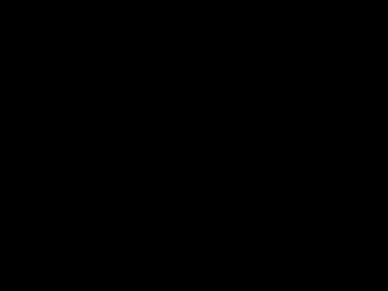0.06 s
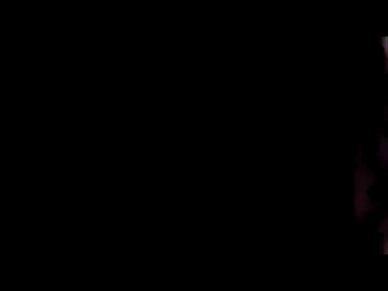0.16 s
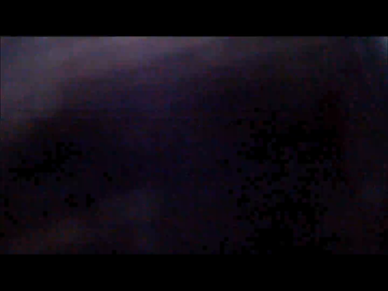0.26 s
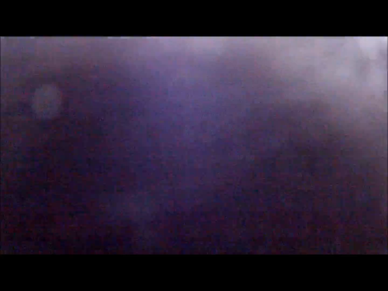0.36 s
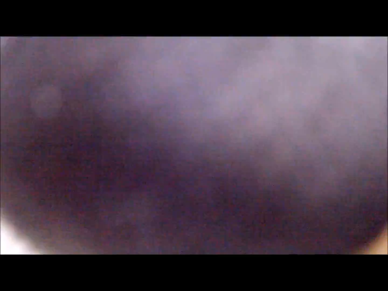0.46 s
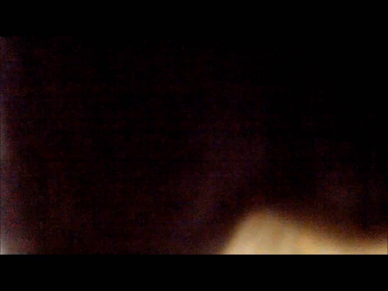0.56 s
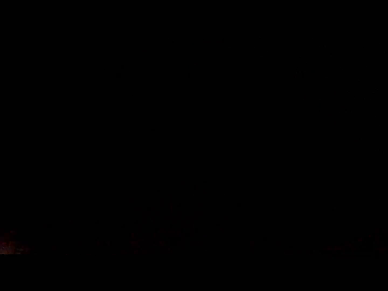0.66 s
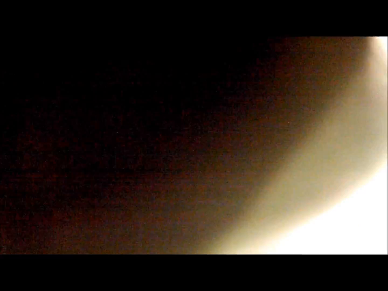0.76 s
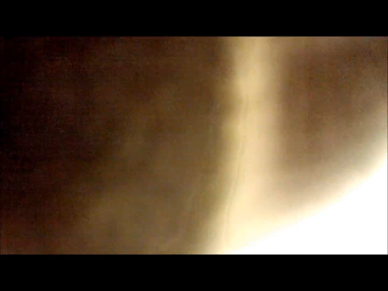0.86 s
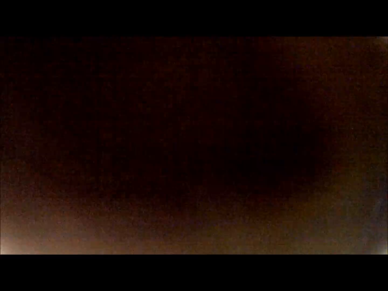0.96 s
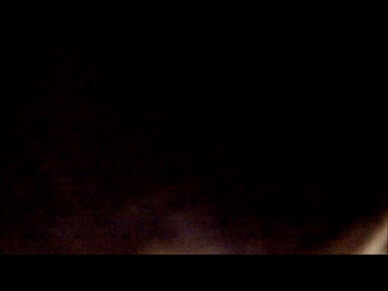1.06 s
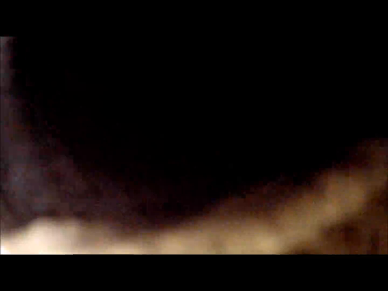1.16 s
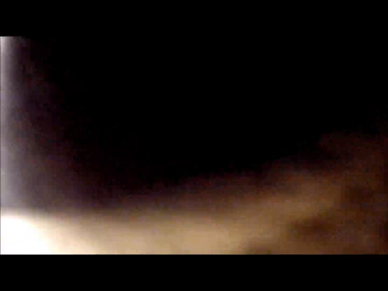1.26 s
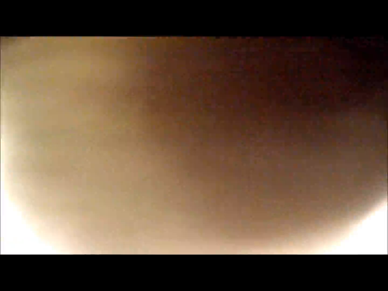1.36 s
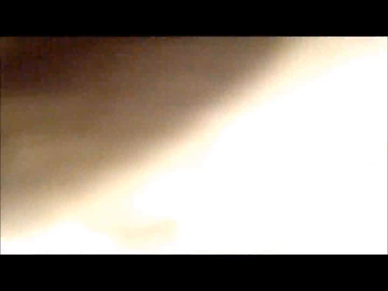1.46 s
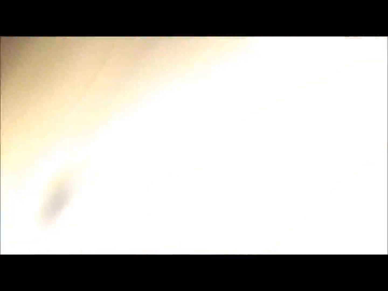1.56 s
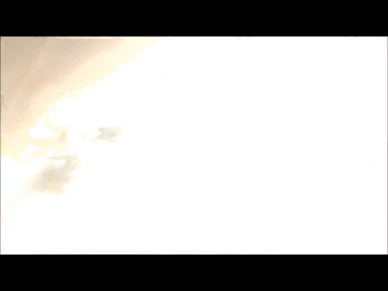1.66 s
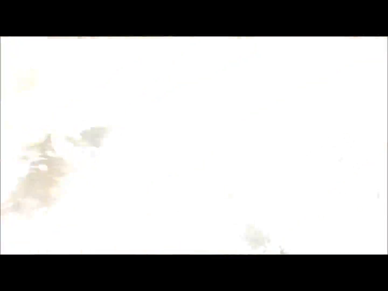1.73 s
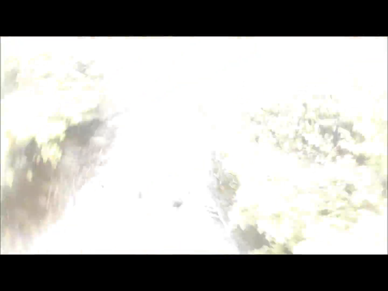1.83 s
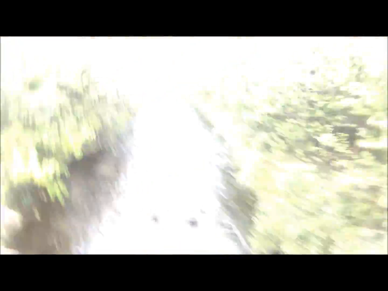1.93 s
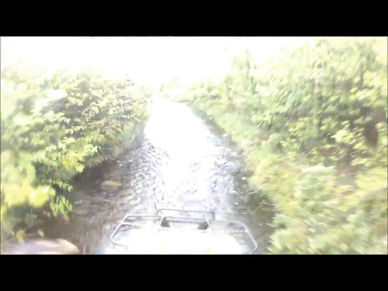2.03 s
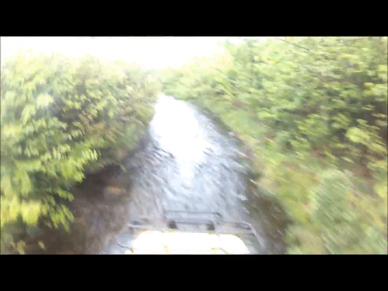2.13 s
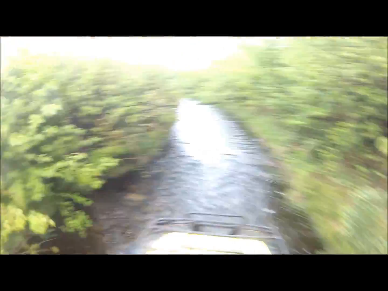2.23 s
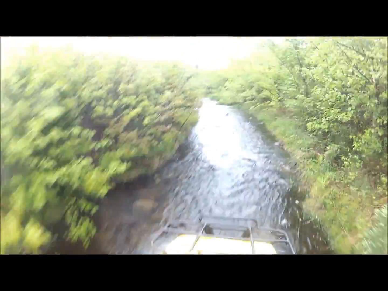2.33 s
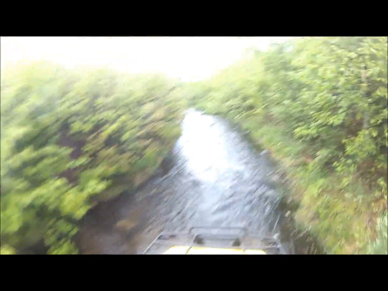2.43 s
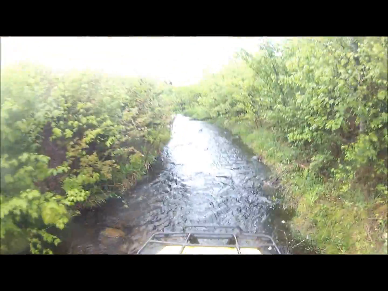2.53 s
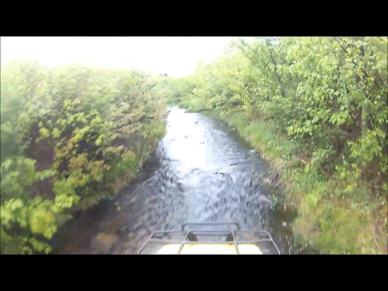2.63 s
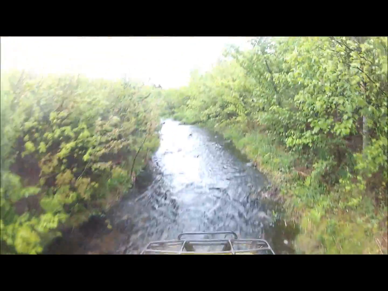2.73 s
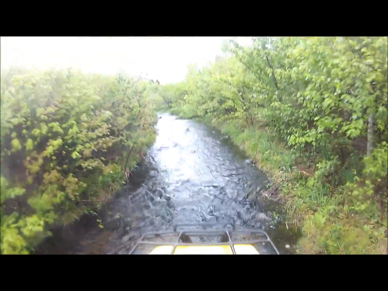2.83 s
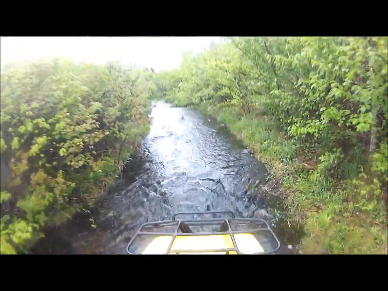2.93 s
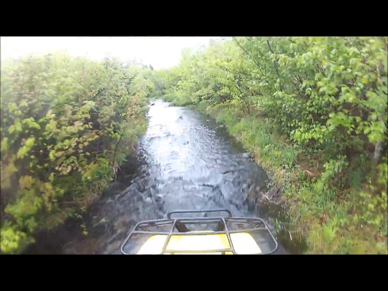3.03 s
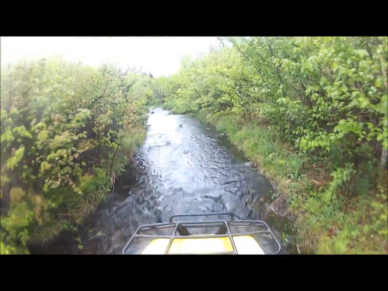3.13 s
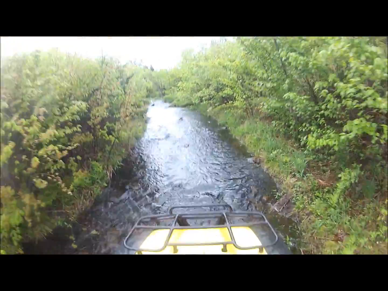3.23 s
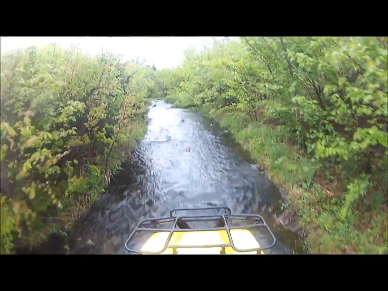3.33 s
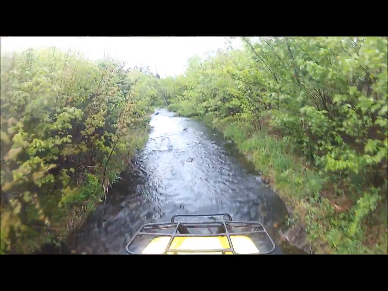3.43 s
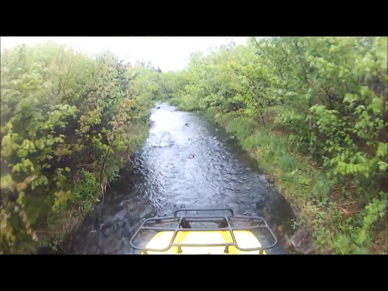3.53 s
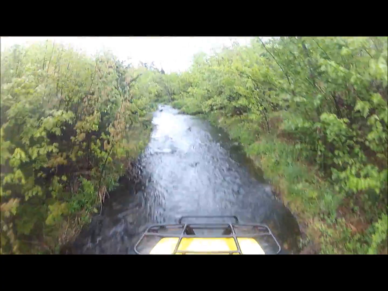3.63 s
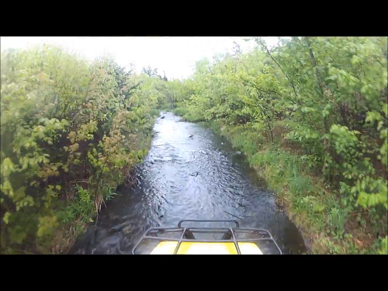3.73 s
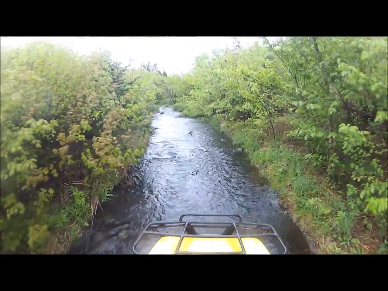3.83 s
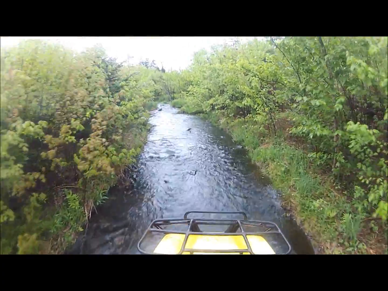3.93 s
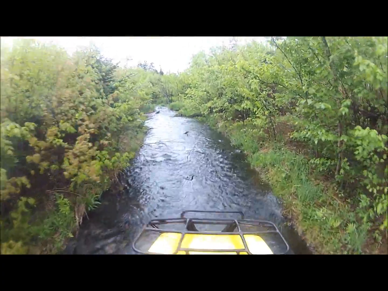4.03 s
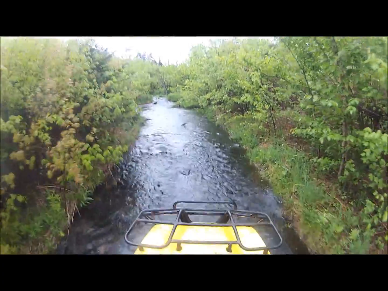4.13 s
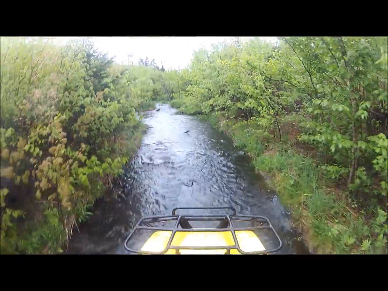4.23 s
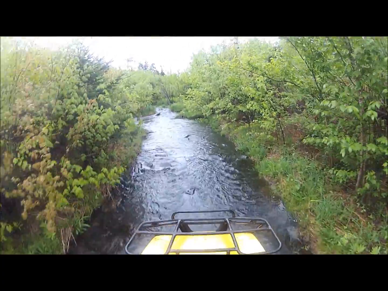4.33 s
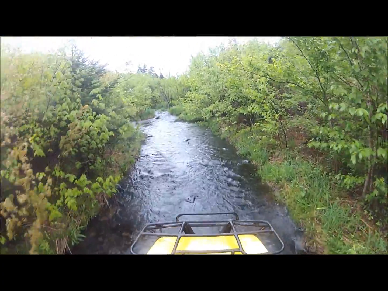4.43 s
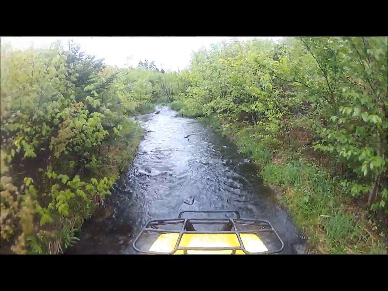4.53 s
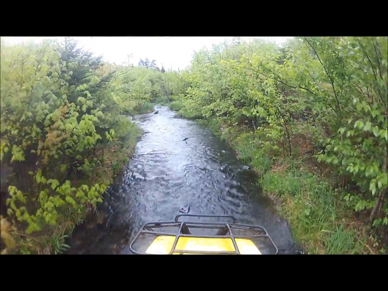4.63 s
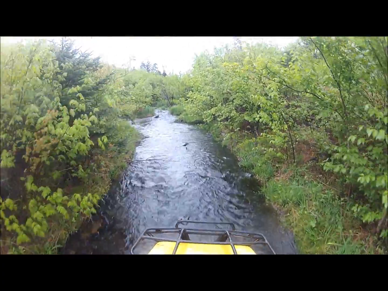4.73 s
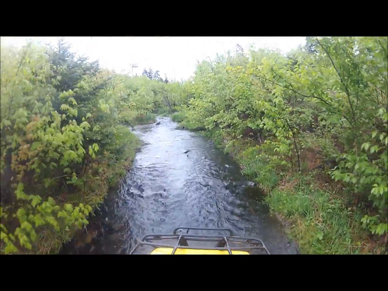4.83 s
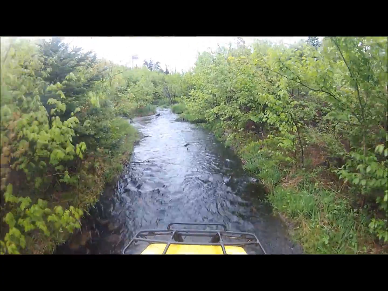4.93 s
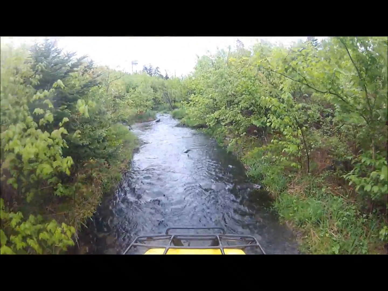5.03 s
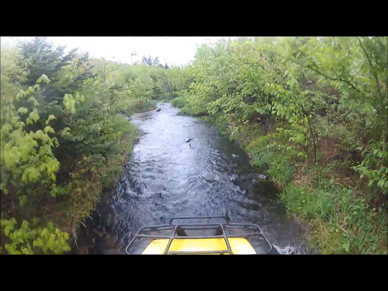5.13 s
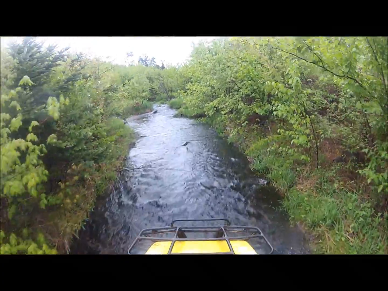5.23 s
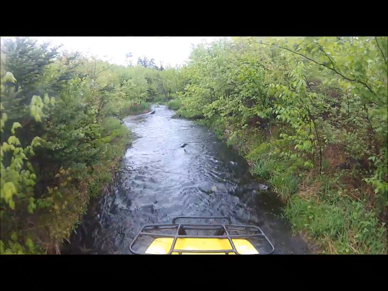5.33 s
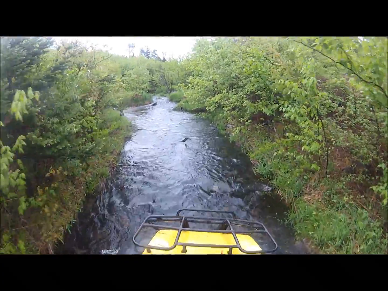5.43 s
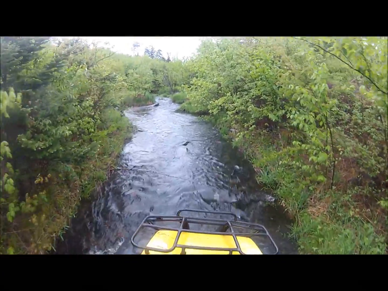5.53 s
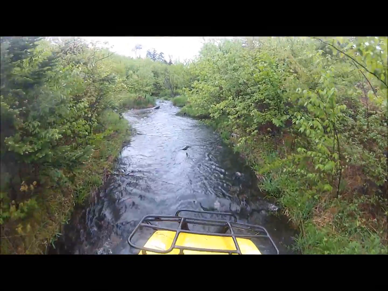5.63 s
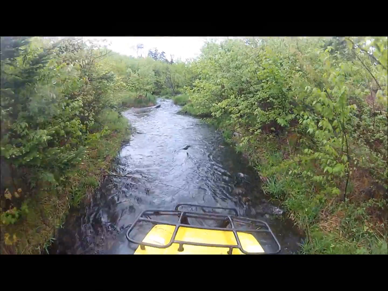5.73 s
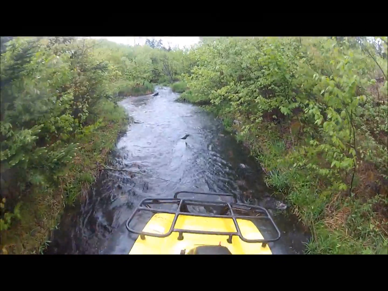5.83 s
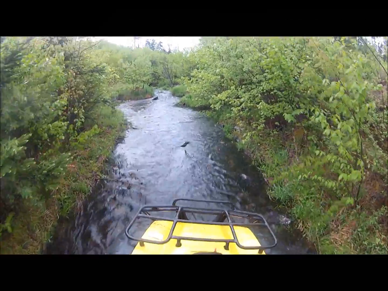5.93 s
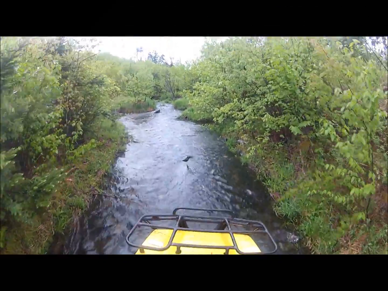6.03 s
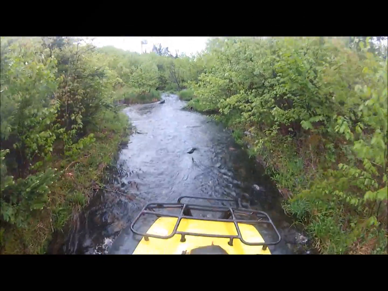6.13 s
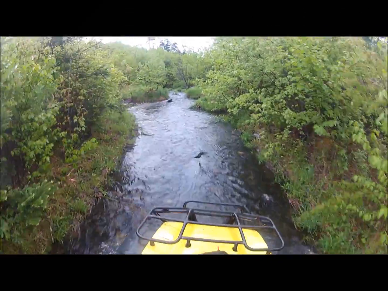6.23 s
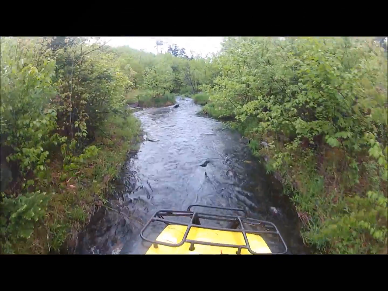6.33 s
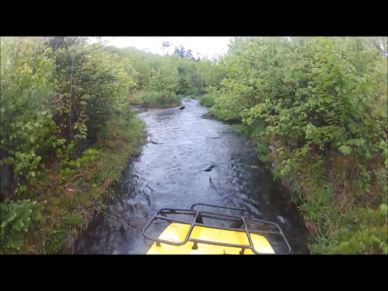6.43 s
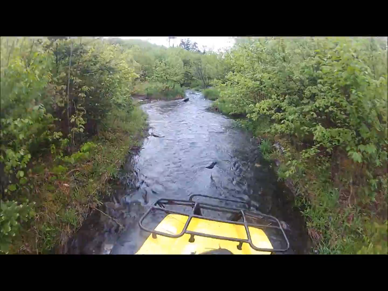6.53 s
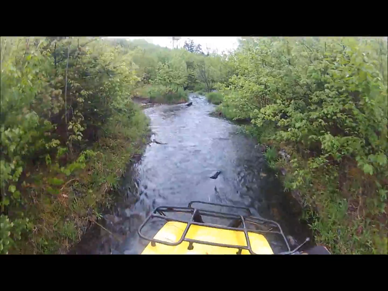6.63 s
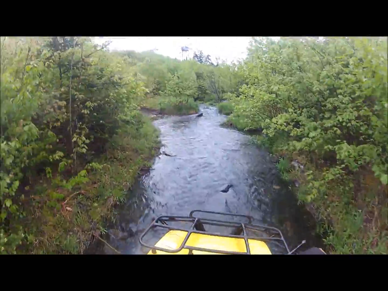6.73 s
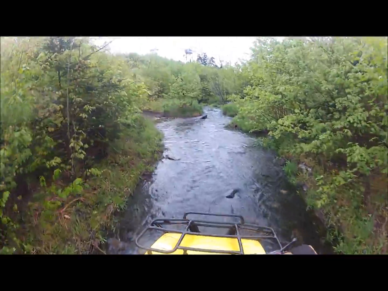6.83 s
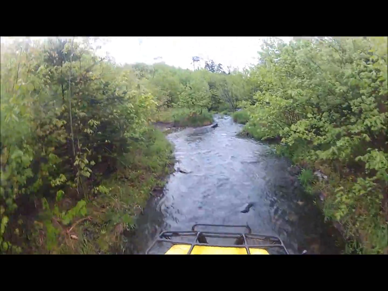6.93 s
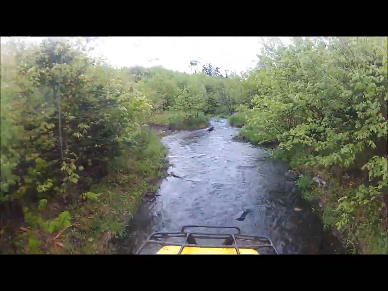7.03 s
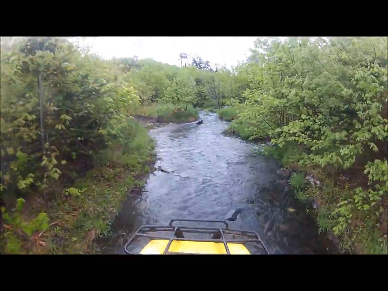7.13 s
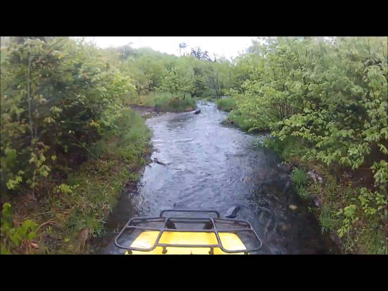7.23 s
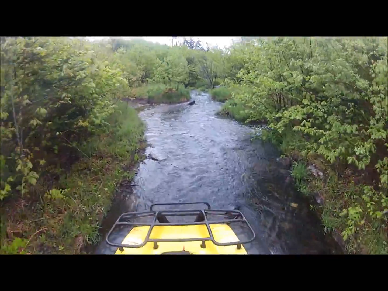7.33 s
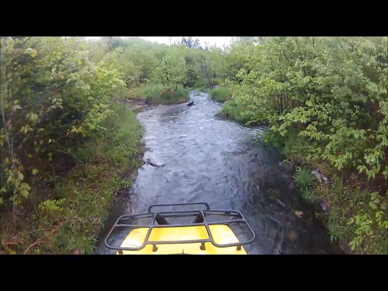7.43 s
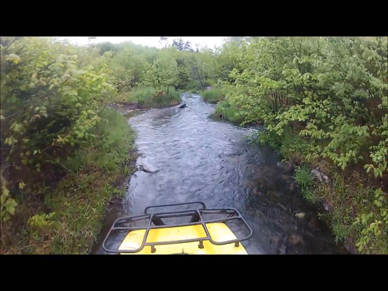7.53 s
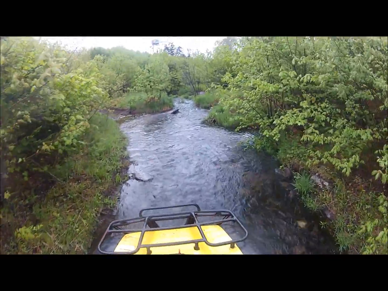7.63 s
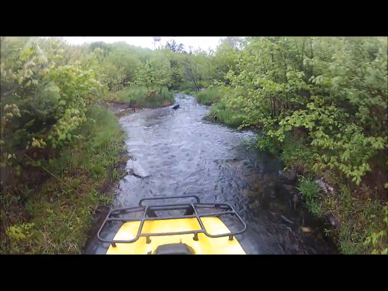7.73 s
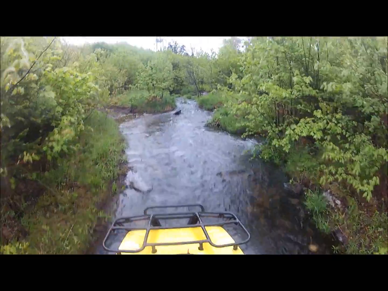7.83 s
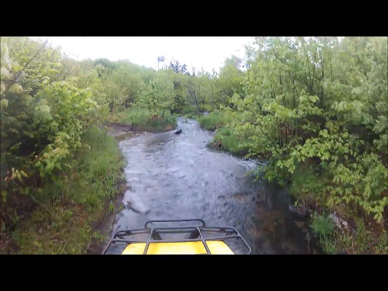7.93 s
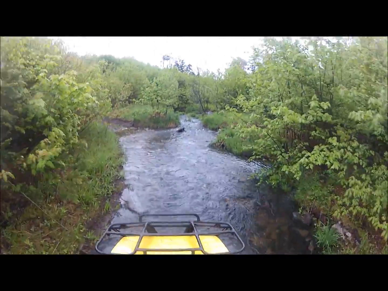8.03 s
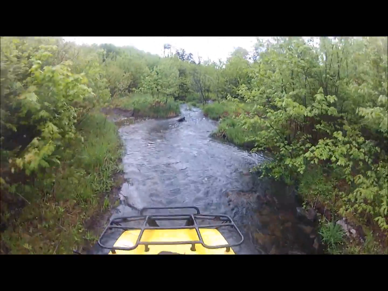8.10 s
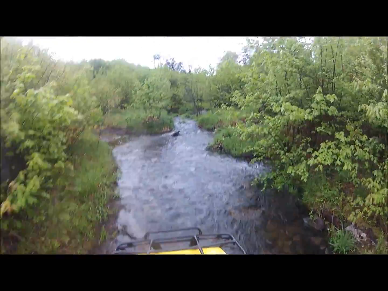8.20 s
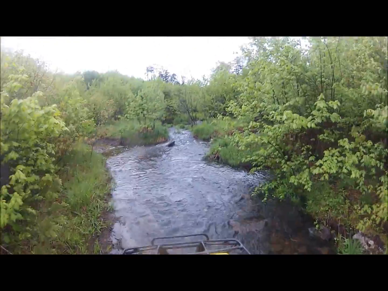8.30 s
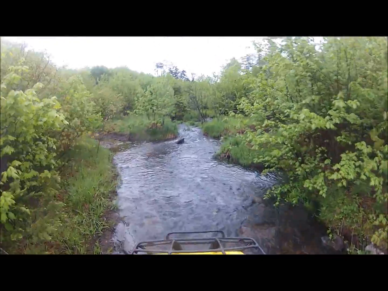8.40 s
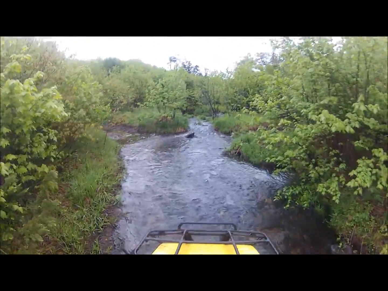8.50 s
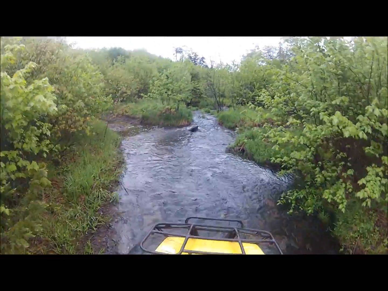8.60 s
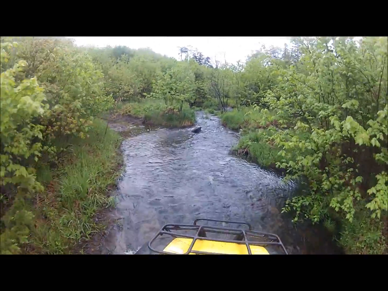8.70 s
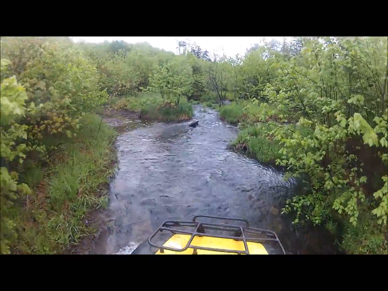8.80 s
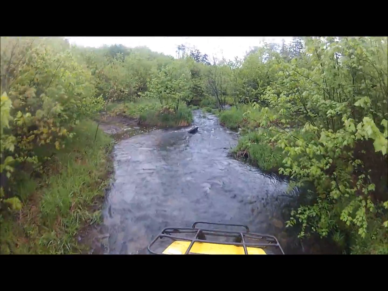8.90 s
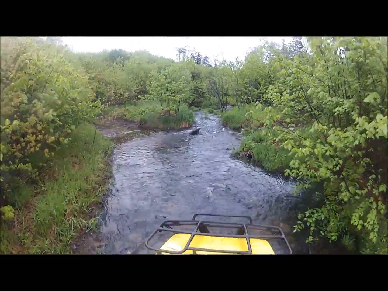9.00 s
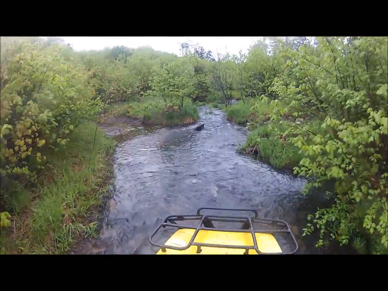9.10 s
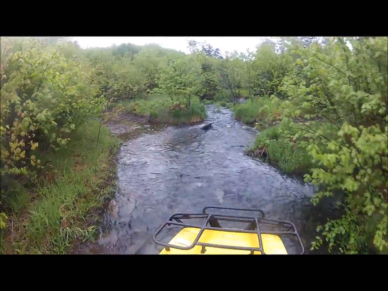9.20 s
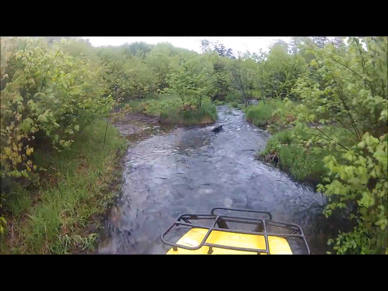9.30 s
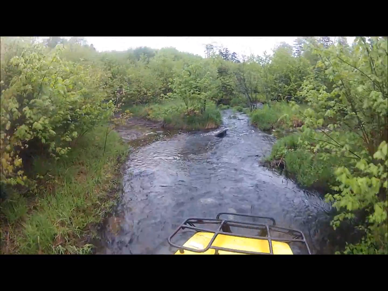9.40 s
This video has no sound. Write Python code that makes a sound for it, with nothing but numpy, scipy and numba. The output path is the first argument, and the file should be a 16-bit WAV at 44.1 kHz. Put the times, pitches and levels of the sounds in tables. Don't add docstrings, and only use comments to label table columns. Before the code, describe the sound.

A gloved hand knocks and scrapes loudly at a camera housing, then a quad bike putters steadily through a splashing creek, muffled and gritty.

```python
import sys
import numpy as np
from scipy import signal
from scipy.fft import rfft, irfft, next_fast_len
from scipy.io import wavfile
from scipy.ndimage import uniform_filter1d
from numba import njit

SR = 44100
rng = np.random.default_rng(int(sys.argv[2]) if len(sys.argv) > 2 else 0)


def persist_wave(psi):
    counts = np.round(np.clip(psi, -1, 1) * 32767).astype(np.int16)
    wavfile.write(sys.argv[1], SR, np.atleast_2d(counts).T)


def ratio(d):
    e = np.asarray(d, float) / 20
    return 10 ** e


N = 417186
HAND_N = int(2.45 * SR)
STRIKE_T = np.arange(8000) / SR
IDLE_HZ = 25.65
SWAY_HZ = 73.5


def level(x, db):
    return x * ratio(db) / np.sqrt(np.mean(x ** 2))


@njit
def svf(x, hz, width):
    y, b, l = np.empty(len(x)), 0., 0.
    g, k = np.tan(np.pi * hz / SR), width / hz
    for i in range(len(x)):
        v = (b + g * (x[i] - l)) / (1 + g * (g + k))
        b, l, y[i] = 2 * v - b, l + 2 * g * v, k * v
    return y


def ring(x, modes):
    out = 0
    for k, (hz, width, db) in enumerate(modes):
        out = out + (-1) ** k * ratio(db) * svf(x, 1. * hz, 1. * width)
    return out


def walk(rate, size=N):
    steps = np.repeat(rng.standard_normal(int(size * rate / SR) + 2), repeats=8)
    slewed = uniform_filter1d(uniform_filter1d(steps, size=8), size=8)
    return 1.3 * np.interp(np.arange(size) * 8 * rate / SR, np.arange(len(slewed)), slewed)


def grit(rate, scatter_db, size=N):
    out, at = np.zeros(size), rng.integers(0, size, int(rate * size / SR))
    out[at] = rng.standard_normal(len(at)) * ratio(scatter_db * rng.exponential(size=len(at)))
    return level(out, 0)


def curves(rows, size=N):
    t, *columns = np.transpose(rows)
    return [np.interp(np.arange(size) / SR, t, column) for column in columns]


def noise_bands(modes, beat, modulation):
    drive = (1 + 0.039 * beat) * (rng.standard_normal((2, N)) + 0.2 * grit(1500, scatter_db=2.5))
    out = 0
    for k, (hz, width, db) in enumerate(modes):
        band = svf(svf(drive[k % 2], 1. * hz, 1.64 * width), 1. * hz, 1.64 * width)
        band = level(band * modulation(hz), db)
        out = out + band * np.sqrt(width / 300) * (1 + .14 * walk(9))
    return out


# f/Hz, bandwidth/Hz, level/dB
SPLASH = [(3348, 157, -6.5), (3620, 390, -12.5), (4310, 440, -14.5), (4810, 310, -15.5), (5120, 750, -22)]


def creek(beat, clatter_db):
    splash_db = -57 + .6 * walk(4)
    return noise_bands(SPLASH, beat, lambda hz: ratio(splash_db - clatter_db))


# f/Hz, bandwidth/Hz,
# level/dB
CLATTER = [(25, 69, -4), (76, 29, 0.5), (199, 65, -7.5), (319, 110, -5.5), (668, 104, -4), (926, 110, -5.5),
           (1190, 170, -7.5), (1530, 120, -4.5), (1774, 134, 1.5), (1990, 310, -3), (2314, 176, -3)]


def valve_gear(beat):
    putt = 1 + .5 * beat
    return noise_bands(CLATTER, beat, lambda hz: putt if 100 < hz < 500 else 1)


def gear_whine(cycles):
    teeth_per_firing, whine_db = 68.5, -7.5
    jitter = np.cumsum(0.0902 * rng.standard_normal(N))
    mesh = np.cos(2 * np.pi * teeth_per_firing * cycles + jitter)
    return mesh * ratio(whine_db + 3.1 * walk(7.6) + 3.9 * walk(60))


# multiple of firing rate, level/dB
FIRING = [(1, -21), (2, -13), (3, -16), (4, -11), (5, 0), (6, -4), (7, -23), (8, -17), (9, -24), (10, -23),
          (11, -20), (12, -13.5), (13, -25), (14, -28), (15, -27), (16, -29)]


def exhaust(hz, cycles):
    pipe_hz, silencer_hz, width_hz = 143, 324, 24
    out = 0
    for k, db in FIRING:
        waver = walk(9)
        lag = 2.8 - 1.9 * max(abs(k - 5) - 1, 0)
        mode_hz = pipe_hz if k < 9 else silencer_hz
        gain = np.hypot(width_hz, k * IDLE_HZ - mode_hz) / np.hypot(width_hz, k * hz - mode_hz)
        phase = 2 * np.pi * k * (cycles - .2) - lag + 0.026 * k * waver[::-1]
        out = out + ratio(db) * gain * (1 + 0.19 * waver) * np.cos(phase)
    return level(out, 0)


# t/s, firing rate f/Hz, exhaust level/dB
RIDE = [(1.95, 27.8, -46), (2.4, 28.8, -42.5), (2.9, 28.6, -43.5), (3.3, 27.2, -42), (3.65, 25.8, -42),
        (4.3, 25.1, -41.5), (4.55, 23.8, -43), (4.9, 24.3, -43.5), (5.65, 26.2, -43), (6.3, 25.4, -41.5),
        (6.9, 25.1, -43), (7.7, 26.4, -44), (7.9, 28.2, -42.5), (8.1, 26.8, -43), (8.5, 29.3, -45),
        (8.85, 27.8, -45), (9.1, 29.5, -43), (9.46, 27.3, -44)]


def engine_and_water():
    hz, exhaust_db = curves(RIDE)
    hz = hz + .38 * np.cos(2 * np.pi * 2.51 * (np.arange(N) / SR - 3.12))
    clatter_db = -48.7 + .8 * (hz - IDLE_HZ) + .6 * walk(6)
    cycles = np.cumsum(hz * (1 + 0.00202 * walk(14))) / SR
    beat = np.cos(2 * np.pi * (cycles - .35))
    bed = creek(beat, clatter_db) + valve_gear(beat) + gear_whine(cycles)
    return exhaust(hz, cycles) * ratio(exhaust_db) + bed * ratio(clatter_db - 1.5)


# t/s, level/dB
NUDGES = [
    (4.1, -51),
    (6.9, -43),
    (7.776, -36),
    (9.0, -44),
]


def mount_bumps():
    out, t = np.zeros(N), STRIKE_T
    for s, db in NUDGES:
        i = int(s * SR)
        out[i:i + len(t)] += ratio(db) * np.sin(2 * np.pi * SWAY_HZ * t) * np.exp(-t / .05)
    return out


# f/Hz, bandwidth/Hz, level/dB
HOUSING = [(655, 180, -4), (1138, 165, -2.5), (2090, 352, 0), (3597, 596, -5.5), (5600, 1200, -22.5),
           (362, 45, -1.5)]


def strikes(rows):
    out, t = np.zeros(N), STRIKE_T
    for s, crack_db, thud_db, hz, thud_hz in rows:
        rattle = rng.standard_normal(len(t)) * np.exp(-(t * 1000 / 3) ** 3)
        spot = [(hz, 1.5 * hz, 0)]
        crack = ring(ring(ring(rattle, HOUSING), spot), spot)
        thud = np.sin(2 * np.pi * thud_hz * t) * t * np.exp(-t * thud_hz * 0.91)
        blow = crack / abs(crack).max() + ratio(thud_db + 5.5) * thud / abs(thud).max()
        i = int(s * SR)
        out[i:i + len(t)] += ratio(crack_db) * blow
    return out


# t/s, crack level/dB, relative thud level/dB, wall f/Hz, thud f/Hz
JOLTS = [
    (2.186, -23, -15, 800, 336),
    (7.775, -34.5, -5, 500, 226),
    (7.786, -42, -10, 720, 243),
    (7.79, -40, -6, 720, 323),
]


def stones():
    return strikes(JOLTS)


# f/Hz, level/dB
SNAP = [(1870, -5), (2160, -10.5), (3315, -7), (3730, -12), (5060, -25), (5050, -24), (1090, -15),
        (303, -11), (620, -16)]


def latch():
    out, t = np.zeros(N), STRIKE_T
    contact_ms, decay_ms = 2.43, 0.88
    envelope = np.clip(t * 4000, 0, 1) * np.exp(-np.clip(t * 1000 - contact_ms, 0, None) / decay_ms)
    tones = sum(ratio(db) * np.sin(2 * np.pi * hz * t + 1.48 * k) for k, (hz, db) in enumerate(SNAP))
    rasp = ratio(-11) * ring(rng.standard_normal(len(t)), [(4800, 3400, 0)])
    i = int(1.2451 * SR)
    out[i:i + len(t)] += envelope * (tones + rasp)
    return out


# t/s, crack level/dB, relative thud level/dB, wall f/Hz, thud f/Hz
KNOCKS = [(0.027, -11, 3, 2020, 131), (0.06, -16.5, -4, 2060, 111), (0.308, -29, 3.5, 2040, 165),
          (0.535, -26, -6, 2060, 110), (0.562, -17.5, -15, 657, 152), (0.649, -18.5, -8, 2150, 173),
          (0.729, -17, -12, 2210, 143), (0.889, -32.5, -3, 401, 128.6), (0.931, -25, 4.5, 743, 115.5),
          (0.984, -16.5, -13, 401, 108), (1.174, -33.5, -1.5, 659, 108), (1.285, -16, -22, 2120, 332),
          (1.334, -22.5, 0, 2060, 220), (1.607, -21.5, -4, 652, 109), (1.666, -20, -12, 2070, 113),
          (1.718, -8.5, -22, 1640, 145)]


def knocks():
    return strikes(KNOCKS)


# start t/s, end t/s, first scrape level/dB, last scrape level/dB, relative flex level/dB
WIPES = [(0, 0.045, -24.5, -22, -10), (0.032, .036, -29.5, -23, 15), (0.064, 0.164, -29.5, -42, -6),
         (0.311, 0.382, -31.5, -33.5, 6.5), (0.46, 0.494, -32.5, -30.5, 9), (0.534, 0.537, -28, -30.5, 11),
         (0.643, 0.717, -27, -28.5, 5), (0.728, 0.797, -30.5, -27.5, 2.5), (0.903, 0.966, -33.5, -31, 8.5),
         (0.986, 1.052, -30.5, -29.5, 5.5), (1.126, 1.166, -38, -31.5, -6), (1.298, 1.355, -30, -29.5, -1),
         (1.368, 1.495, -32, -31.5, -1), (1.506, 1.586, -38.5, -34.5, -2), (1.603, 1.669, -28, -26.5, -1),
         (1.684, 1.712, -22.5, -22.5, -10), (1.721, 1.726, -18, -17, -18)]
# widest swing t/s, level/dB, build-up t/s
SHOVES = [(.035, -21, 0.018), (.075, -26, 0.018), (.165, -27.5, 0.036), (.39, -21.5, 0.046),
          (.505, -15.5, 0.028), (.56, -17, .02), (.66, -26, 0.03), (.73, -28.5, .04), (.8, -24, .03),
          (.91, -23, 0.017), (1.0, -23, 0.055), (1.15, -31, 0.017), (1.25, -31, 0.017), (1.34, -24, .03),
          (1.395, -26.5, 0.018), (1.44, -26.5, .03), (1.485, -25, 0.033), (1.55, -30, .03),
          (1.61, -24, 0.047), (1.65, -22, .02), (1.695, -10.5, .014), (1.734, -12, 0.044),
          (2.259, -43.5, .08)]


def contact():
    t = np.arange(HAND_N) / SR
    lift_db = 2500 * np.clip(t - 1.732, 0, None)
    scrape = ratio(-47 - lift_db) ** 2 + 1e-10
    flex, sway = scrape * ratio(5.5), 1e-7
    bite_db_s, release_db_s = 453, 612
    for start, end, first_db, last_db, flex_db in WIPES:
        db = np.interp(t, [start, end], [first_db, last_db]) - lift_db
        db = db - bite_db_s * np.clip(start - t, 0, None) - release_db_s * np.clip(t - end, 0, None)
        scrape = scrape + ratio(db) ** 2
        flex = flex + ratio(db + flex_db) ** 2
    free_db_s, gripped_db_s = 174, 398
    for s, db, build_s in SHOVES:
        loss = free_db_s if s > 1.7 else gripped_db_s
        build_db = 7.6 * (np.clip(s - t, 0, None) / build_s) ** 2
        sway = sway + ratio(db - build_db - loss * np.clip(t - s, 0, None)) ** 2
    scrape_db, flex_db, sway_db = (10 * np.log10(p) for p in (scrape, flex, sway))
    creak_db = -14 + 0.57 * (sway_db - scrape_db) + 0.5 * (sway_db + 26.5)
    return scrape_db, flex_db, sway_db, np.clip(creak_db, -20, 1.5)


# f/Hz, bandwidth/Hz, level/dB
CREAK = [(669, 31, 4.5), (1660, 240, -8.5)]


def friction(creak_db):
    rub = rng.standard_normal(HAND_N) + 0.57 * grit(2000, scatter_db=3.0, size=HAND_N)
    rub = rub * ratio(1.32 * walk(70.0, size=HAND_N) + 1.04 * walk(200, size=HAND_N))
    walls = ring(ring(rub, HOUSING), [(1700, 3900, 0)])
    creak = ring(ring(rub[::-1].copy(), CREAK), [(1000, 2100, 0)])
    hiss = ring(ring(rub, [(5400, 1400, 0)]), [(5400, 1400, 0)])
    return level(walls, -1.05) + level(creak, 0.7) * ratio(creak_db) + level(hiss, -37.5) * ratio(-.9 * creak_db)


def mount_sway(held):
    hz = SWAY_HZ * (1 + held * (.09 * walk(34.78, size=HAND_N) - .08))
    turn = 2 * np.pi * np.cumsum(hz) / SR
    return (np.sin(turn) + 0.094 * np.cos(2 * turn)) * ratio(3.5 + held * walk(30.3, size=HAND_N))


# f/Hz, bandwidth/Hz, level/dB
FLEX = [(132, 71, -2), (198.4, 92, -4), (294, 118, -8)]


def wiping():
    scrape_db, flex_db, sway_db, creak_db = contact()
    push = ratio(2.8 * walk(30.0, size=HAND_N)) * rng.standard_normal(HAND_N)
    flex = level(ring(ring(push, FLEX), [(166, 200, 0)]), -1.0)
    shove = level(ring(ring(push, [(42, 26, 0)]), [(42, 26, 0)]), -9.5)
    held = np.clip((scrape_db + 49.5) / 15, 0, 1)
    hand = friction(creak_db) * ratio(scrape_db) + flex * ratio(flex_db)
    hand = hand + (mount_sway(held) + held * shove) * ratio(sway_db)
    return np.pad(hand, (0, N - HAND_N))


def scene():
    background = engine_and_water() + mount_bumps() + stones()
    return (background + latch() + knocks() + wiping())[None]


def band_limit(x):
    return signal.sosfilt(signal.butter(12, 16430, fs=SR, output="sos"), x)


def record(dry):
    clock_hz, top_hz = 12000, 15340
    x = signal.sosfilt(signal.butter(6, 6100, fs=SR, output="sos"), np.clip(dry, -1, 1))
    sampled = x * (1 + 2 * np.cos(2 * np.pi * clock_hz * np.arange(N) / SR))
    n = next_fast_len(N)
    hz = np.arange(n // 2 + 1) * SR / n
    response = np.sinc(hz / clock_hz) * np.where(hz < top_hz, 1, .004)
    held = irfft(rfft(sampled, n) * response, n)[:, :N]
    return band_limit(np.clip(held, -1, 1))


dry = scene()
out = record(dry)
persist_wave(out)
```